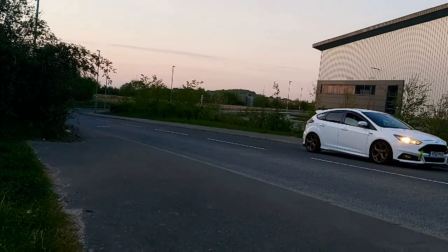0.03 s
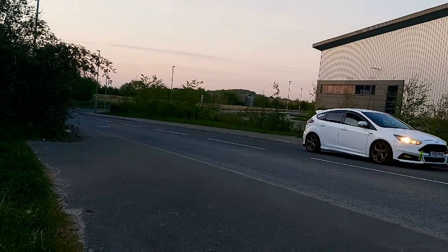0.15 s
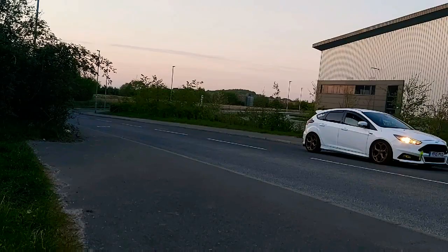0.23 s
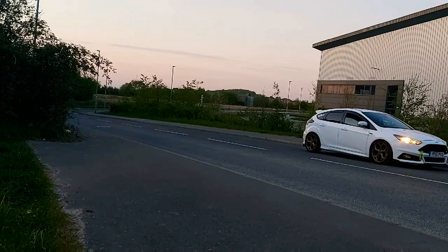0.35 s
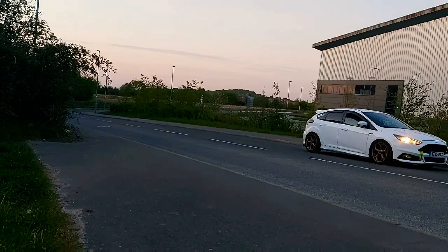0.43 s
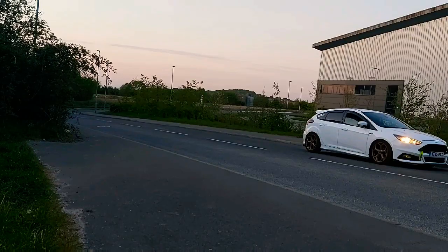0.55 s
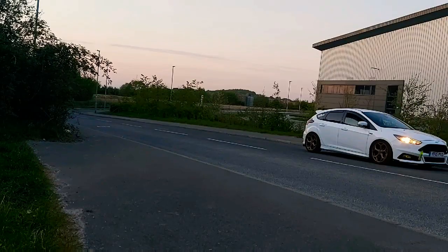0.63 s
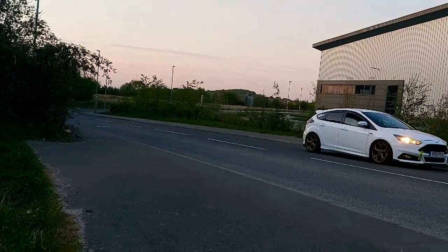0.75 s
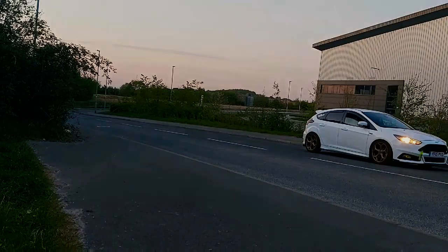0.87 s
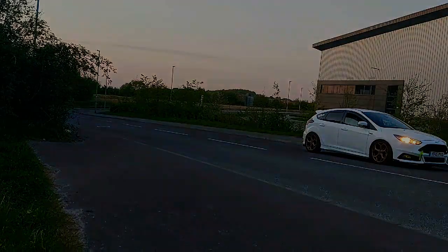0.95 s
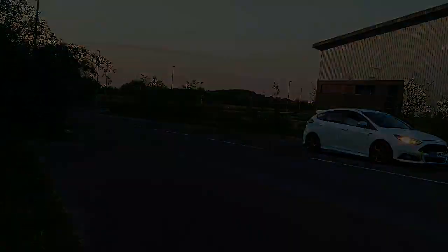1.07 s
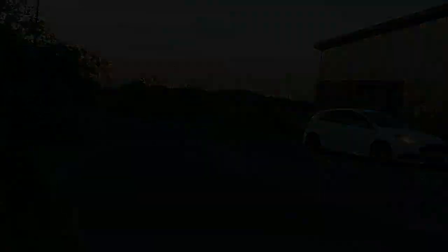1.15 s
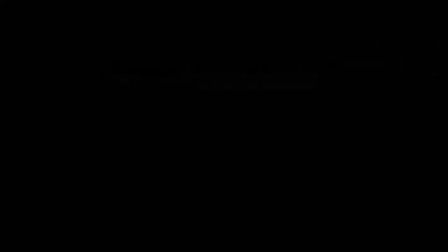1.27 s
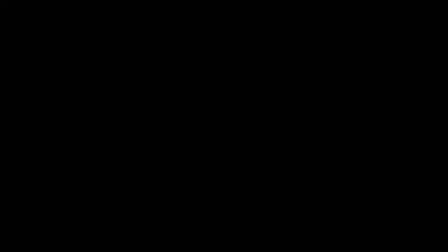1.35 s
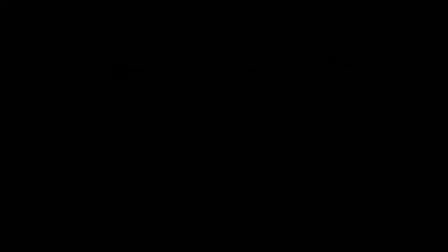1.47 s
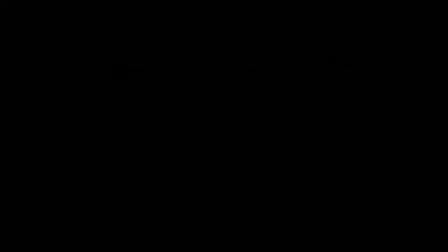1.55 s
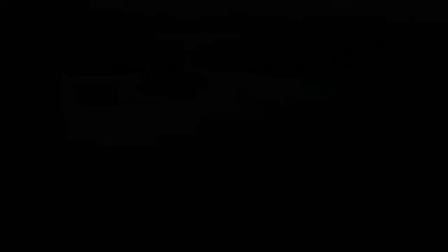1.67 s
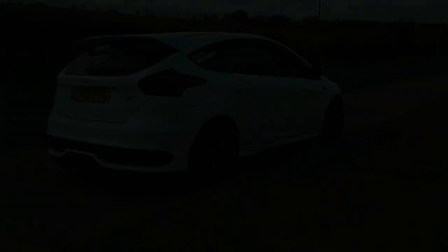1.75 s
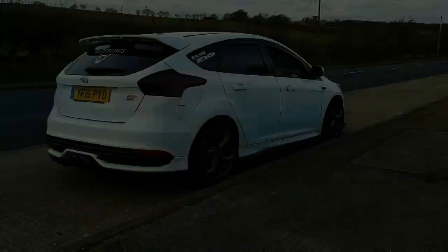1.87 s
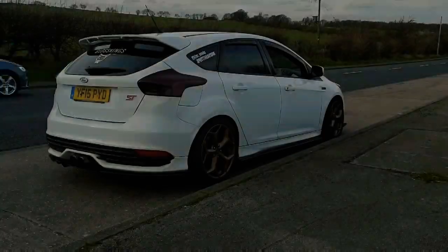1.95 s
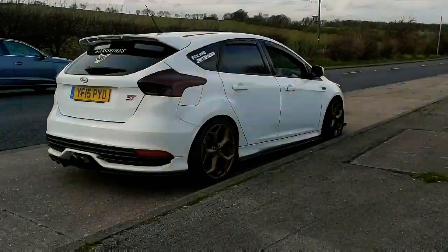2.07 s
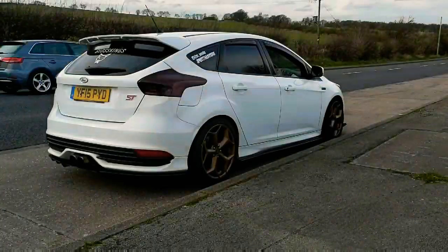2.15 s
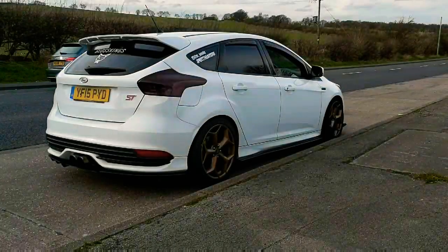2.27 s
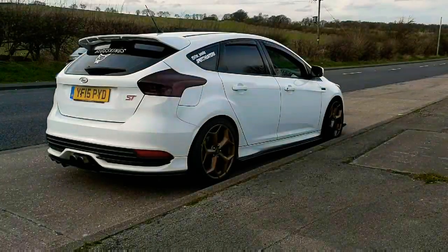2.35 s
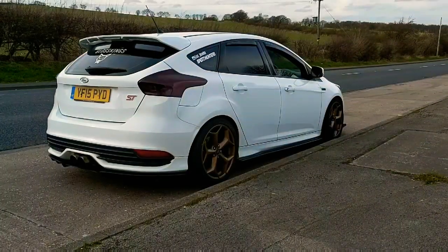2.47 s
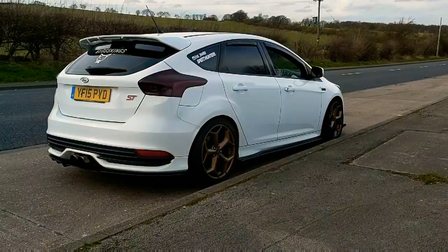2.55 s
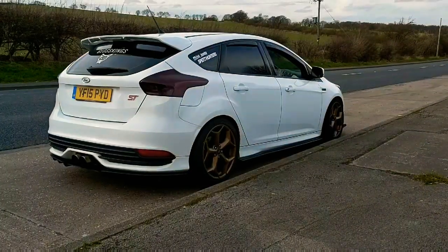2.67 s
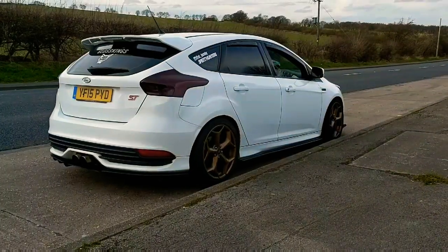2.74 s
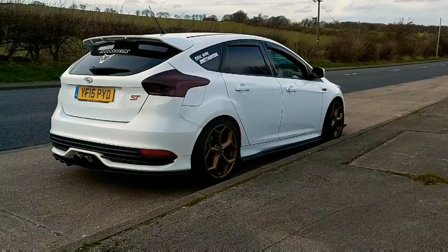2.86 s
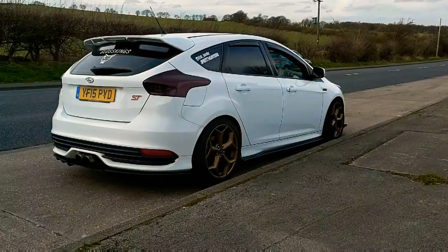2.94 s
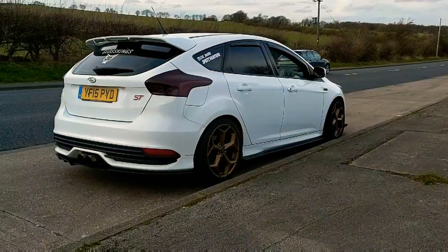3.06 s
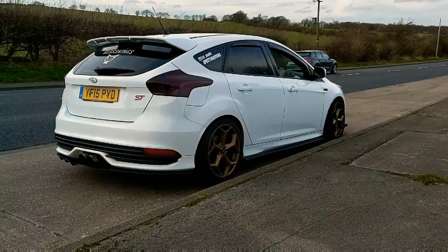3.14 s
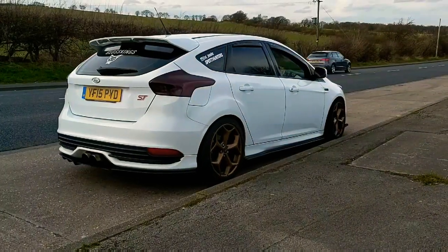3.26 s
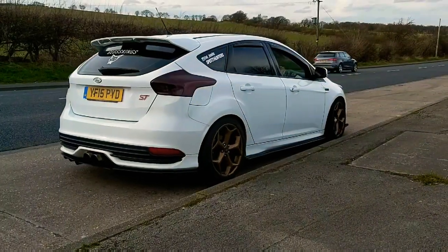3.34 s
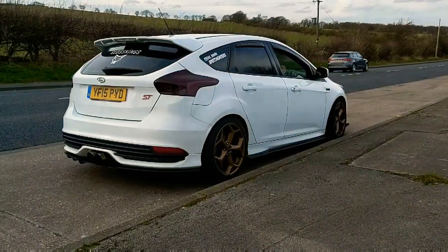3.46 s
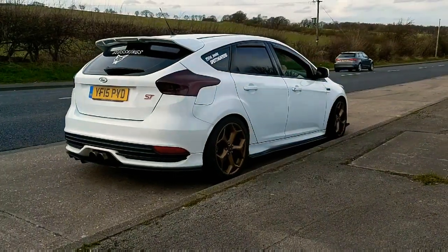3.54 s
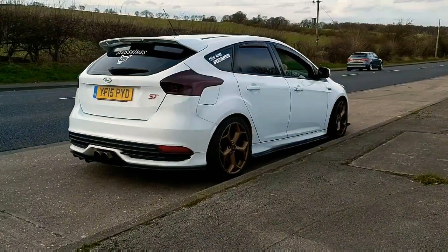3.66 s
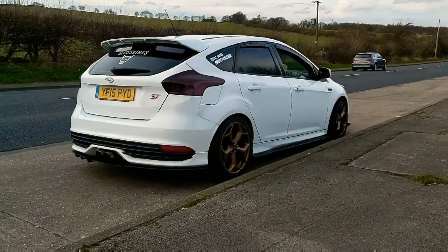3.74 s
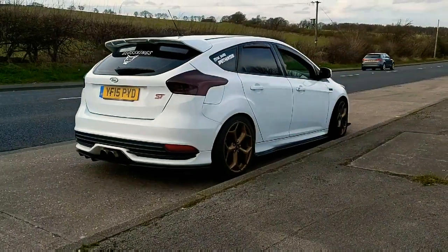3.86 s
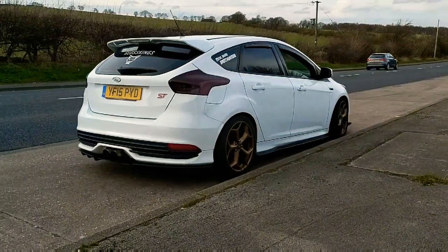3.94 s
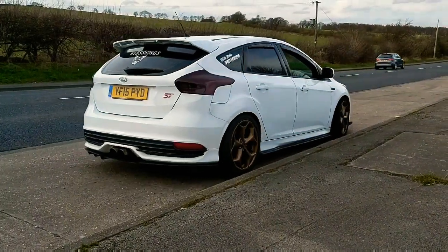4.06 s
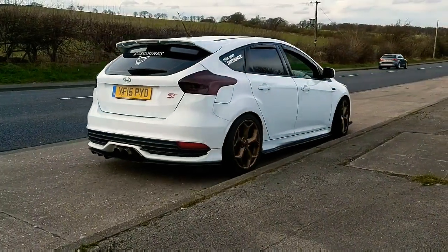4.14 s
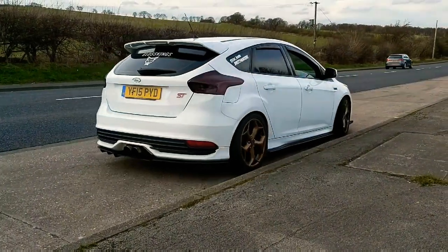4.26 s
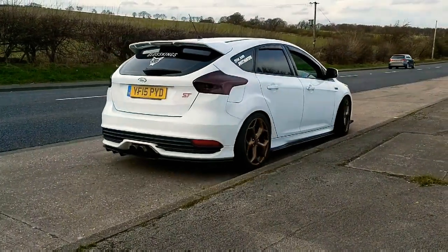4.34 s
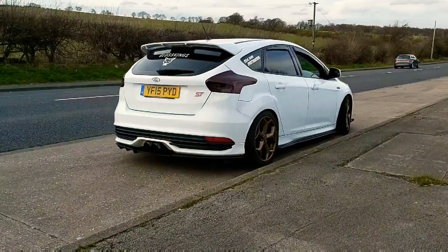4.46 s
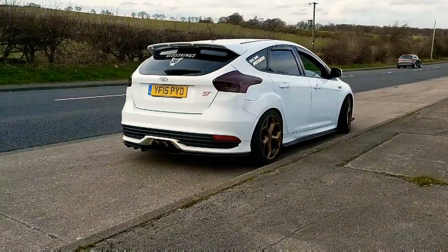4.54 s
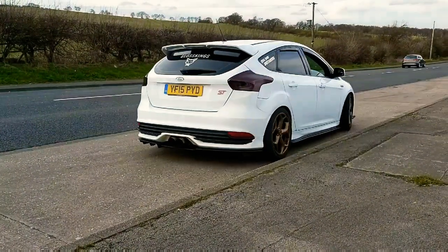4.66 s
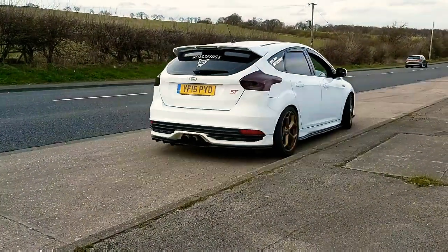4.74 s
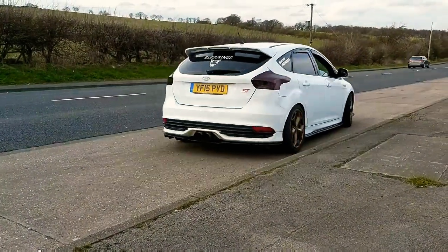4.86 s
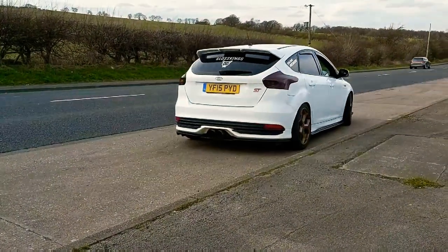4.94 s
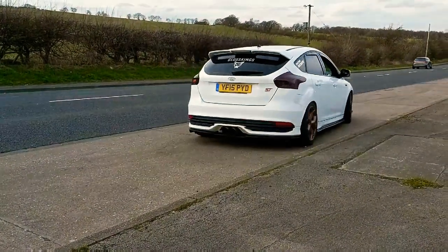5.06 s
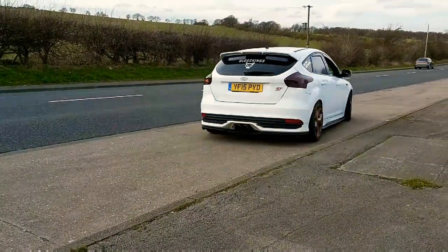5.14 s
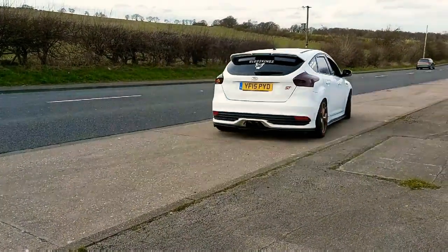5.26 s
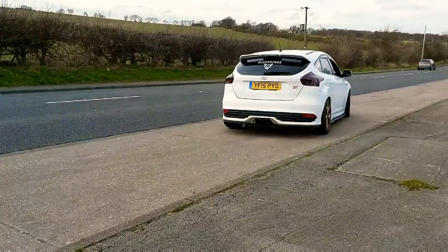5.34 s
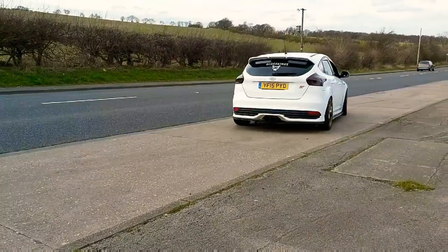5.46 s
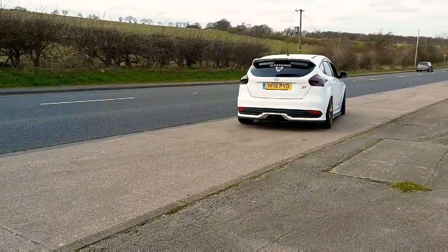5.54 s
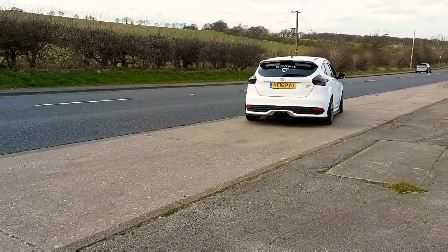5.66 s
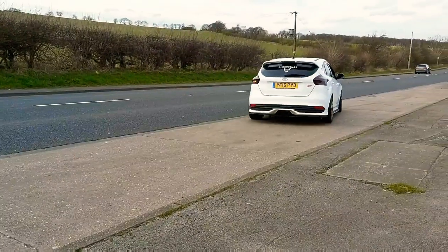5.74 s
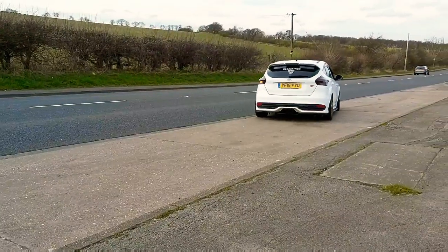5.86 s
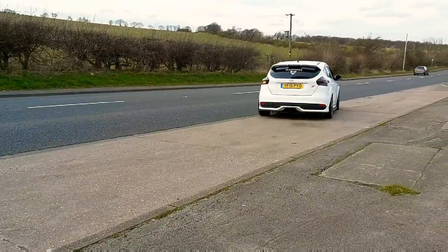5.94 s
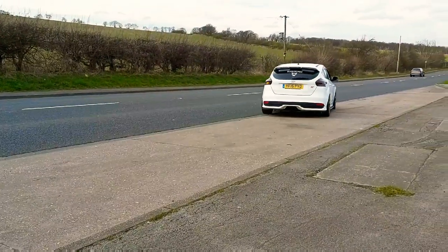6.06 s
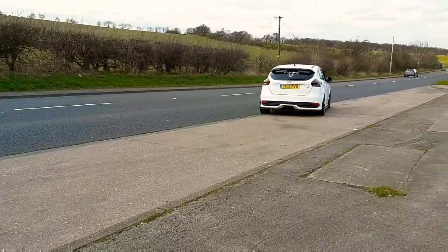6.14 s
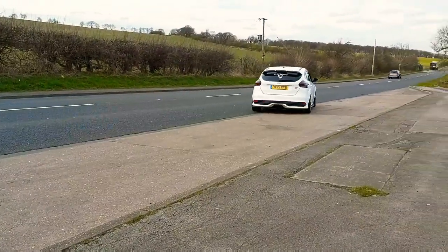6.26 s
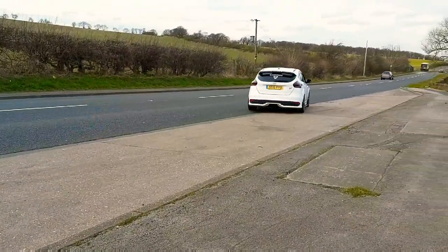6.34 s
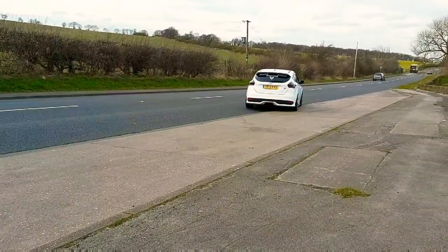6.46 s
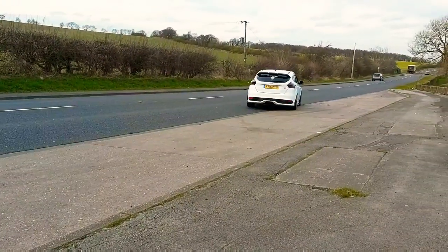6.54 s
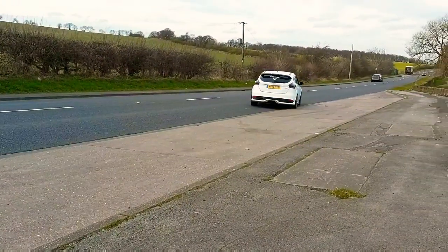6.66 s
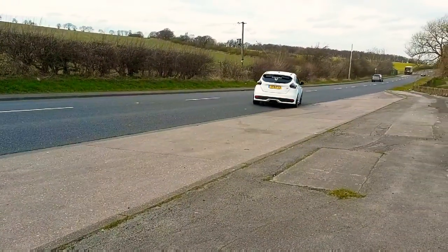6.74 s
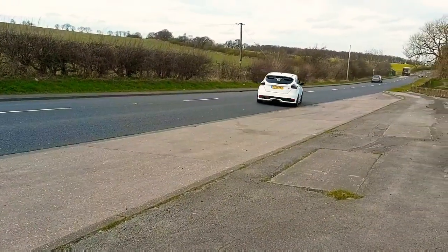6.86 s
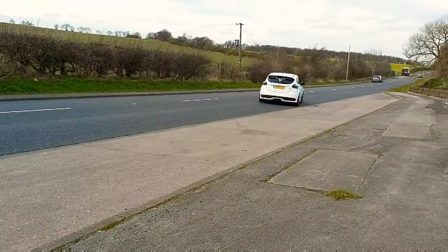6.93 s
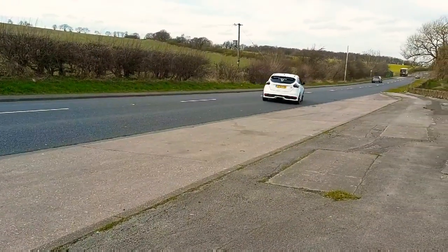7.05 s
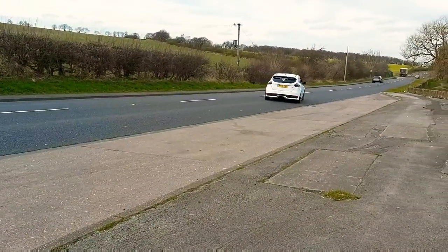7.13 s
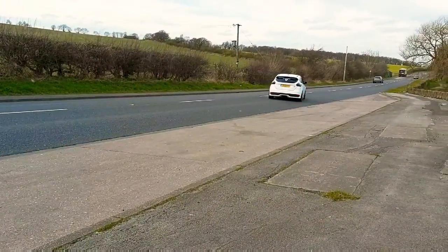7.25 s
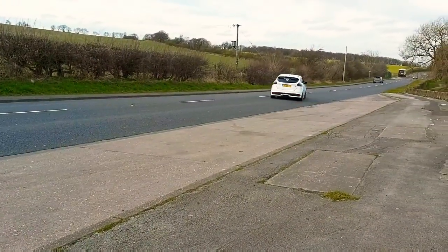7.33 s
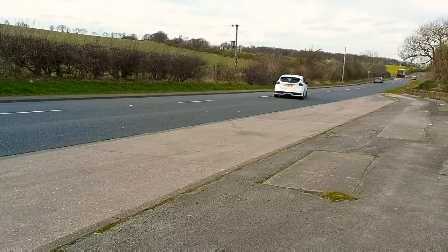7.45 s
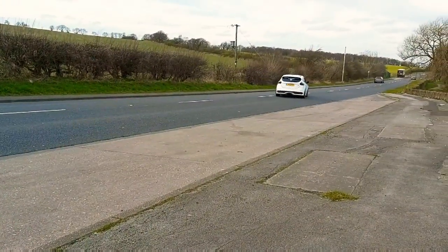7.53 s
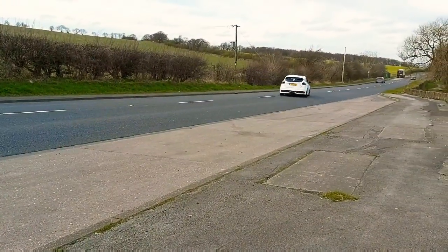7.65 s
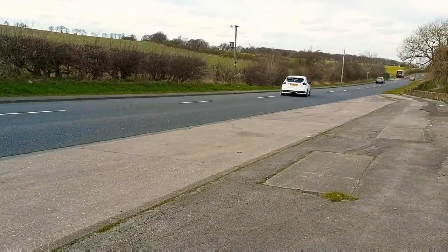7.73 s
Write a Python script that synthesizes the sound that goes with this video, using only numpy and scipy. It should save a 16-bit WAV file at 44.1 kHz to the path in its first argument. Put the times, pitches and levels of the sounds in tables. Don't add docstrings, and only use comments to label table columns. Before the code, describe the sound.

First a quiet roadside: distant steady engine thuds, faint metallic ticking, bird calls, a faint hum and low wind puffs, all fading away. Then suddenly a close, loping exhaust with hissing gas while a passing car's tyres rush by. The engine blips up twice, bites, and climbs in pitch into harsh, bright crackling blasts, with short reflections from verge and hedges and gritty microphone distortion.

```python
import sys
import numpy as np
from scipy import signal
from scipy.fft import rfft, irfft
from scipy.io import wavfile
from scipy.ndimage import uniform_filter1d

SR = 44100
rng = np.random.default_rng(int(sys.argv[2]) if len(sys.argv) > 2 else 0)


def file_out(sig):
    cols = np.atleast_2d(sig).T
    lim = np.clip(cols, -1, 1)
    pcm = np.round(lim * 32767).astype(np.int16)
    wavfile.write(sys.argv[1], SR, pcm)


def gain_from_decibels(decibels):
    exponent = np.asarray(decibels, float) / 20
    return 10 ** exponent


N = 343980
T = np.arange(N) / SR
CUT_S = 2.272
PORT_LAG = np.full(N, 8)

# hz, level_db (per Hz)
WIND = [(20, -17), (60, 9.5), (150, 3), (350, -9), (700, -40), (2000, -94)]


def rms_one(x):
    return x / np.sqrt(np.mean(x ** 2) + 1e-20)


def in_time(rows):
    s, *columns = np.transpose(rows)
    return [np.interp(T, s, c) for c in columns]


def colour(x, spectrum):
    hz, db = np.transpose(spectrum)
    grid = np.maximum(np.fft.rfftfreq(8192, 1 / SR), 1)
    log_gain = np.interp(np.log(grid), np.log(hz), np.maximum(db, -90)) * np.log(10) / 20
    cepstrum = irfft(log_gain)
    cepstrum[1:4096] *= 2
    cepstrum[4097:] = 0
    impulse = irfft(np.exp(rfft(cepstrum)))
    return signal.oaconvolve(x, impulse.reshape((1,) * (x.ndim - 1) + (-1,)), axes=-1)[..., :N]


def drift(rate):
    steps = rng.standard_normal(400)
    return np.interp(T * rate, np.arange(len(steps)), steps)


def evened(x, span_s):
    span = int(span_s * SR)
    power = uniform_filter1d(uniform_filter1d(x ** 2, span), span)
    return x / np.sqrt(power + 1e-12)


def delayed(x, samples):
    return np.interp(np.arange(N) - samples, np.arange(N), x)


def placed(x, pan_db, lag):
    left = delayed(x, np.maximum(lag, 0)) * gain_from_decibels(pan_db / 2)
    right = delayed(x, np.maximum(-lag, 0)) * gain_from_decibels(-pan_db / 2)
    return np.array([left, right])


def stereo_noise(spectrum, alike, patchy_db):
    mid, side = rng.standard_normal((2, N))
    side = np.sqrt(1 - np.clip(alike, 0, 1)) * side * np.array([[1], [-1]])
    pair = np.sqrt(1 + alike) * mid + side
    return rms_one(colour(pair, spectrum) * gain_from_decibels(patchy_db * drift(25)))


def smeared(x, hz, width_hz):
    r = np.exp(-np.pi * width_hz / SR)
    a = [1, -2 * r * np.cos(2 * np.pi * hz / SR), r * r]
    return signal.lfilter(a[::-1], a, x)


def swells(peaks_s, rises_s, fall_s, heights_db):
    late = T - np.reshape(peaks_s, (-1, 1))
    shape = np.where(late < 0, 1 + late / np.reshape(rises_s, (-1, 1)), 1 - late / fall_s)
    return np.max(np.reshape(heights_db, (-1, 1)) * np.clip(shape, 0, 1), axis=0)


def firings(per_s, weak_db, late, scatter_db, jitter):
    count = np.cumsum(per_s) / SR + .95
    number = np.arange(1, int(count[-1]))
    chance = rng.standard_normal((1000, 2))[:len(number)]
    even = np.interp(number, count, np.arange(N)).astype(int)
    odd = number % 2
    at = np.interp(number + jitter * chance[:, 0] + odd * late[even], count, np.arange(N))
    whole = np.clip(at.astype(int), 0, N - 2)
    size = gain_from_decibels(scatter_db * chance[:, 1] + weak_db[even] * odd)
    clicks = np.zeros(N)
    np.add.at(clicks, whole, size * (1 - at % 1))
    np.add.at(clicks, whole + 1, size * (at % 1))
    return clicks


def tail_pipe(x):
    return x + gain_from_decibels(-16.5) * delayed(x, 4.666 * SR / 1000)


def pipe_tone(clicks, gas, load):
    # hz, level_db (per Hz)
    standing = [(35, -46), (60, -2), (97, 3.5), (167, 8), (194, -14.5), (222, 4.5), (254, -10.5), (275, 1),
                (310, -1), (341, 9), (600, -36.5), (1000, -42.5), (1500, -43.5), (1950, -80.5),
                (3300, -120)]
    light = [(29, -55), (50, -12), (80, 4), (120, 6.5), (150, 7), (178, 3.5), (208, -12.5), (240, -0.5),
             (300, 2.5), (380, 9), (455, -20.5), (516, -7.5), (603, -23.5), (993, -38.5), (1500, -50.5),
             (2600, -95)]
    biting = [(35, -50.5), (60, -14.5), (80, -4.5), (113, -0.5), (145, 4), (175, -8.5), (203, -9.5),
              (272, 5), (387, -8), (441, -1.5), (558, -20.5), (854, -19.5), (2000, -51.5), (2600, -95),
              (4400, -120)]
    pulling = [(47, -40), (80, -3.5), (114, -0.5), (151, -3.5), (187, -18), (238, -6.5), (276, 6.5),
               (316, -1), (480, -4.5), (700, -28.5), (868, -13), (941, -23), (2000, -44), (2600, -79.5),
               (4400, -120)]
    loaded = [(70, -19), (100, 13), (160, 7.5), (240, 8.5), (340, 14.5), (480, 7.5), (650, 2), (830, -5.5),
              (1050, 1), (1250, -7.5), (1500, -35), (1900, -9), (2600, -19), (4500, -78)]
    pushed = smeared(clicks, hz=624, width_hz=840)
    muffled = smeared(smeared(clicks, hz=356.0, width_hz=164), hz=756, width_hz=1050)
    stages = [(muffled, standing), (muffled, light), (pushed, biting), (clicks, pulling),
              (tail_pipe(clicks), loaded)]
    pipe = gain_from_decibels(-17.5 - 2.6 * load) * evened(colour(gas, light), .08)
    for stage, (pulses, spectrum) in enumerate(stages):
        pipe += np.clip(1 - np.abs(load - stage), 0, 1) * evened(colour(pulses, spectrum), .06)
    return evened(pipe, 0.51)


def rasp(clicks, gas, load):
    # hz, level_db (per Hz)
    edge = [(700, -45.5), (1400, 8), (2100, 6.5), (2900, -1.5), (5000, -20.5), (9000, -29), (16000, -39.5)]
    fronts = clicks * uniform_filter1d(clicks, size=3) ** 2
    crack = evened(colour(tail_pipe(fronts), edge), 0.18)
    treble = signal.butter(1, 3000, "high", fs=SR, output="sos")
    snap = evened(signal.sosfilt(treble, fronts + .02 * gas), .06)
    crack += gain_from_decibels(-4.5) * np.clip(3 - load, 0, 1) * snap
    puff = gain_from_decibels(-2 - 3 * load) * evened(colour(gas, edge), .08)
    return crack * np.clip(load - 1, 0, 1) + puff


def drive():
    # time_s, firings_per_s
    speed = [(3.5, 38.5), (3.93, 54), (4.12, 58.2), (4.32, 55.3), (4.6, 63.7), (4.85, 63.8), (5.31, 50.2),
             (5.56, 68.6), (5.7, 69.3), (5.87, 82.3), (6.1, 91.2), (6.21, 99), (6.69, 123.5), (6.81, 137.5),
             (6.885, 133.5), (6.97, 141.7), (7.31, 163.7), (7.8, 188.5)]
    # time_s, exhaust_db
    effort = [(3.5, -15.5), (3.7, -10.5), (4.1, -7), (4.3, -7.5), (4.6, -5), (4.9, -8), (5.35, -11.5),
              (5.56, -7.5), (5.85, -7), (6.11, -5.5), (6.19, -9.5), (6.7, -9), (7.2, -5.5), (7.8, -7.5)]
    # start_s, length_s
    shifts = [
        (4.22, .18),
        (5.47, .1),
        (6.13, .06),
        (6.6, .4),
    ]
    # weak_db, late_ms
    uneven = [
        (-1.2, .24),
        (-2.6, .3),
        (-1.4, .25),
        (-1.6, .4),
        (-1, .41),
    ]
    stage_rasp_db = [-54.5, -50.5, -57.5, -62.5, -26]
    # peak_s, build_s, height_db (above the stage's rasp)
    crackles = [(3.78, 0.091, 0), (4.12, 0.11, 2), (4.5, .1, 4.5), (4.68, 0.47, 1.5), (4.88, 0.14, 3.5),
                (5.96, 0.15, 17), (6.03, 0.13, 22), (6.1, 0.14, 22), (6.849, 0.11, 24.5),
                (7.061, 0.034, 8.5), (7.279, 0.062, 4.5), (7.4, 0.055, 4), (7.739, 0.075, 6)]
    per_s, exhaust_db = uniform_filter1d(in_time(speed) + in_time(effort), size=1500, axis=1)
    load = sum(np.clip((T - start) / length, 0, 1) for start, length in shifts)
    by_stage = [*np.transpose(uneven), stage_rasp_db]
    weak_db, late_ms, rasp_db = (np.interp(load, range(len(stage_rasp_db)), c) for c in by_stage)

    s, build_s, height_db = np.transpose(crackles)
    crackle_db = swells(s, build_s, .07, height_db)
    exhaust_db = exhaust_db + .08 * crackle_db
    boost_lag_s = .09
    rasp_db = delayed(rasp_db, boost_lag_s * SR) + crackle_db

    late = late_ms / 1000 * per_s * (1 + .2 * drift(7))
    clicks = firings(per_s, weak_db, late, scatter_db=.6, jitter=.003)
    gas = signal.lfilter([1], [1, -.996], clicks) * rng.standard_normal(N)
    out = gain_from_decibels(exhaust_db) * pipe_tone(clicks, gas, load) + gain_from_decibels(rasp_db) * rasp(clicks, gas, load)
    return out * np.interp(T, [3.505, 3.53], [0, 1])


def near_idle():
    # time_s, lift_db
    lopes = [(2.319, 10.5), (2.513, 7.5), (2.668, 3.5), (2.79, -4), (2.93, 7), (3.008, 15.5), (3.11, 10.5),
             (3.18, 1.5), (3.29, 6), (3.429, 10.5), (3.5, 13)]
    # hz, level_db (per Hz)
    idle_pipe = [(24, -32), (40, -2.5), (54, -2), (75, 8), (102, -3), (125, -2.5), (192, -3.5), (253, -14),
                 (341, 0.5), (460, -28.5), (700, -47), (910, -57), (1540, -120)]
    per_s = 33.0 + 3.0 * drift(12)
    s, lift_db = np.transpose(lopes)
    exhaust_db = -24.5 + swells(s, 0.029, 0.019, lift_db)
    clicks = firings(per_s, np.zeros(N), np.zeros(N), scatter_db=2.0, jitter=.12)
    gas = signal.lfilter([1], [1, -.998], clicks) * rng.standard_normal(N)
    thuds = rms_one(colour(smeared(clicks, hz=350, width_hz=120), idle_pipe))
    pipe = thuds + gain_from_decibels(1.5) * rms_one(colour(gas, idle_pipe))
    return gain_from_decibels(exhaust_db) * evened(pipe, 0.065) * np.interp(T, [3.5, 3.53], [1, 0])


def reflections(car):
    # time_s, delay_ms, level_db
    verge = [(2.2, 2.5, -17.5), (4.2, 4.22, -9.5), (5.0, 3.65, -13.5), (5.6, 2.9, -10.5), (6.2, 3.03, -22),
             (6.8, 2.27, -18.5), (7.8, 1.42, -16)]
    # delay_ms, closing_ms_per_s, level_db, left_minus_right_db
    hedges = [
        (9.0, .9, -15.5, 9),
        (14.0, 1.3, -17, -7.5),
        (3.01, 0.2975, -15.5, 4),
    ]
    echo_ms, echo_db = in_time(verge)
    echo = gain_from_decibels(echo_db) * delayed(car, echo_ms * SR / 1000)
    out = placed(echo, pan_db=0.5, lag=np.full(N, -9.0))
    for ms, closing, hedge_db, side_db in hedges:
        late = (ms - closing * (T - CUT_S)) * SR / 1000
        out += placed(gain_from_decibels(hedge_db) * delayed(car, late), side_db, 0 * T)
    return out


def passing_car(tyre_db, pan_db, lag):
    # hz, level_db (per Hz)
    hum = [(90, -17.5), (170, -5), (230, 5), (420, 1.5), (600, -44)]
    # hz, level_db (per Hz)
    tyres = [(290, -23), (500, -1), (666, -5), (954, 3), (1600, -9.5), (1960, -12.5), (2130, -19),
             (2360, -19), (3240, -27), (4910, -31.5), (5830, -34.5), (8980, -46), (9650, -79.5),
             (13000, -80.5), (15500, -48)]
    out = gain_from_decibels(-30 - 9 * (T - CUT_S)) * stereo_noise(hum, alike=0.25, patchy_db=5.5)
    left, right = gain_from_decibels(tyre_db + 6) * stereo_noise(tyres, alike=0.32, patchy_db=.8)
    return out + [placed(left, pan_db, lag)[0], placed(right, pan_db, lag)[1]]


def far_car(per_s, exhaust_db):
    # hz, level_db (per Hz)
    far_pipe = [(30, -52), (50, -6.5), (75, 7.5), (100, 3), (125, -1.5), (150, 3), (180, -20.5), (200, -21),
                (230, -16), (290, -17.5), (340, -9.5), (390, -38), (900, -38.5), (2500, -93)]
    clicks = firings(per_s, np.full(N, -1.5), np.zeros(N), scatter_db=1.5, jitter=.012)
    gate = signal.lfilter([1], [1, -.997], delayed(clicks, 0.0038 * SR))
    rattle = gate * rng.standard_normal(N) + 14 * delayed(clicks, .008 * SR)
    tick = signal.lfilter(*signal.iirpeak(1705, 22, fs=SR), rattle)
    return gain_from_decibels(exhaust_db) * (gain_from_decibels(-28) * rms_one(tick) - evened(colour(clicks, far_pipe), 0.39))


def wind(wind_db):
    # time_s, peak_db
    gusts = [(0.716, -26), (0.757, -25), (0.798, -23), (0.838, -25.5), (1.003, -42.5), (1.09, -25),
             (1.193, -21), (1.243, -44), (1.308, -22), (1.484, -29), (1.697, -51.5), (1.741, -29),
             (1.808, -25.5), (1.887, -25)]
    puffs = np.zeros(N)
    for s, peak_db in gusts:
        puffs[int(s * SR)] = gain_from_decibels(peak_db)
    thumps = gain_from_decibels(-43.5) * rms_one(colour(smeared(puffs, hz=202, width_hz=190), WIND))
    lumps = stereo_noise(WIND, alike=.3, patchy_db=3) * gain_from_decibels(wind_db + 2.5 * drift(20))
    return thumps * gain_from_decibels(np.array([[-12], [0]])) + lumps * gain_from_decibels(np.array([[-12], [4]]))


def birds():
    # start_s, length_s, first_hz, last_hz, level_db
    calls = [
        (0.0, .2, 2420, 2350, -61),
        (.17, .28, 2810, 3000, -56),
        (.6, 0.36, 2570, 2580, -57),
        (0.798, .085, 4700, 5150, -65),
        (0.977, .12, 4650, 4900, -68),
        (1.01, .09, 1950, 1960, -56),
        (1.25, 0.19, 2250, 2400, -50),
        (1.41, .3, 2580, 2700, -55),
    ]
    out = np.zeros(N)
    for start, length, first_hz, last_hz, level_db in calls:
        gone = np.clip((T - start) / length, 0, 1)
        hz = first_hz + (last_hz - first_hz) * gone + 60 * drift(30)
        breath = rms_one(signal.lfilter(*signal.butter(2, 170, fs=SR), rng.standard_normal(N) + .08))
        swell = np.sqrt(np.abs(np.sin(np.pi * gone)))
        out += gain_from_decibels(level_db) * breath * swell * np.sin(2 * np.pi * np.cumsum(hz) / SR)
    return out


def fan_drone():
    return gain_from_decibels(-61 + 1.2 * drift(6.74)) * np.sin(2 * np.pi * 497 * T)


def surroundings():
    # hz, level_db (per Hz)
    air = [(250, -34.5), (400, -11.5), (490, -11), (670, -14), (960, -18.5), (1110, -12), (1440, -28.5),
           (1700, -13.5), (2200, -22.5), (2600, -14.5), (4400, -30), (5800, -31), (9000, -33.5),
           (16000, -47.5)]
    left, right = stereo_noise(air, alike=.65, patchy_db=.5)
    return gain_from_decibels(-45.5) * np.array([delayed(left, PORT_LAG), right])


def across_the_road():
    # time_s, exhaust_db, wind_db
    levels = [(0.0, -26, -30), (.25, -31.5, -42), (.8, -27.5, -35), (1.25, -29.5, -30), (1.5, -28, -36),
              (1.72, -26.5, -24.5), (2.25, -34, -26)]
    fade_start_s, fade_end_s = 0.83, 2.275
    exhaust_db, wind_db = in_time(levels)
    left_to_go = np.clip((fade_end_s - T) / (fade_end_s - fade_start_s), 1e-4, 1)
    fader = gain_from_decibels(-4) * left_to_go ** 0.99
    fade_db = 20 * np.log10(fader)
    engine = far_car(np.full(N, 24.85), exhaust_db + fade_db + 3)
    out = placed(engine, pan_db=-1, lag=PORT_LAG)
    out += wind(wind_db + fade_db)
    calls = gain_from_decibels(6.5) * placed(birds() + fan_drone(), pan_db=-13.0, lag=PORT_LAG)
    return out + fader * (calls + surroundings())


def behind_the_pipe():
    # time_s, tyre_db, left_minus_right_db, left_lag_samples
    road = [(2.28, -35.5, -3.5, -23.5), (2.6, -35.5, -0.5, -8.5), (3.0, -37.5, -1, 5), (3.5, -35, 0, 4.5),
            (4.0, -36.5, 0, 5), (4.5, -40, -3, 8.5), (5.2, -40.5, 0, 6)]
    tyre_db, pan_db, lag = in_time(road)
    car = drive() + near_idle()
    out = placed(car, pan_db=-1.7, lag=lag / 3) + reflections(car)
    out += passing_car(tyre_db, pan_db, lag)
    return out + gain_from_decibels(-33) * stereo_noise(WIND, alike=.2, patchy_db=2)


def scene():
    return across_the_road() * (T < 2.25) + behind_the_pipe() * np.clip((T - CUT_S) / 0.0037, 0, 1)


def roll_off(x):
    return signal.sosfilt(signal.butter(12, 16370, fs=SR, output="sos"), x)


def record(dry):
    thin = signal.sosfilt(signal.butter(2, 45, "high", fs=SR, output="sos"), dry)
    clipped = thin / (1 + np.abs(thin / 1.01) ** 30) ** (1 / 30)
    beat_hz = 3889.5
    slip = (np.arange(N) * beat_hz / SR + .022 * rng.standard_normal(N)) % 1 - .5
    slip = slip * (np.arange(N) > CUT_S * SR)
    return roll_off(clipped + gain_from_decibels(-0.5) * slip * np.gradient(clipped, axis=1))


dry = scene()
out = record(dry)
file_out(out)
```